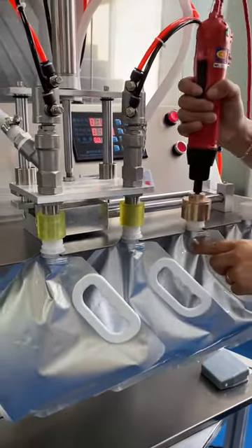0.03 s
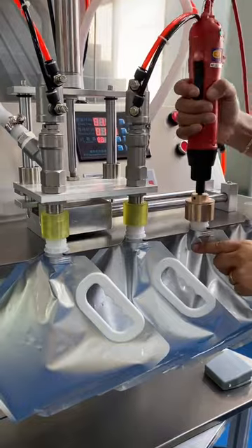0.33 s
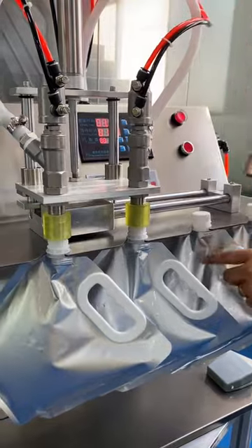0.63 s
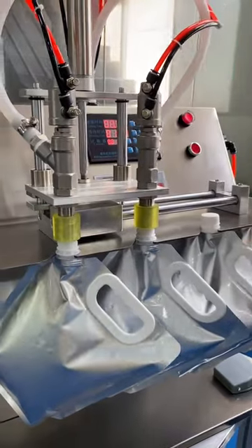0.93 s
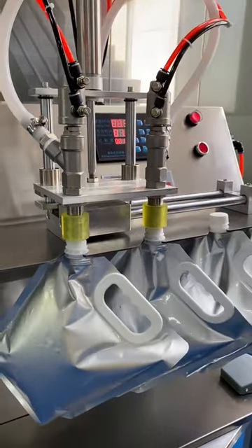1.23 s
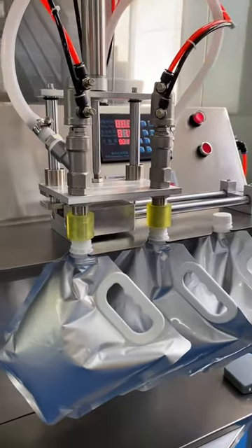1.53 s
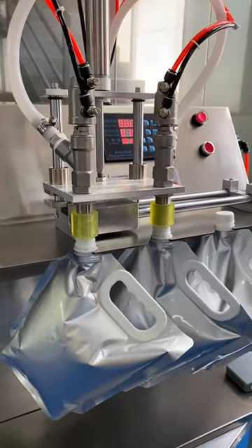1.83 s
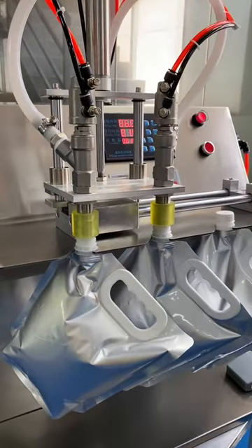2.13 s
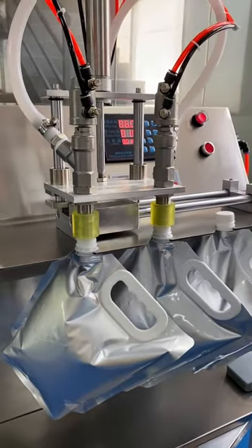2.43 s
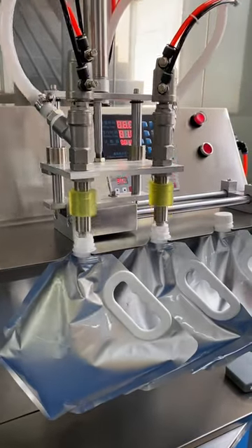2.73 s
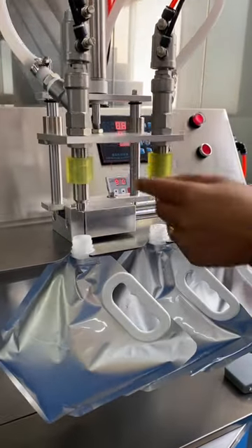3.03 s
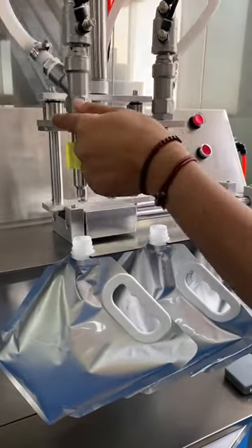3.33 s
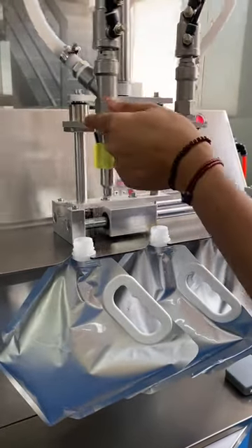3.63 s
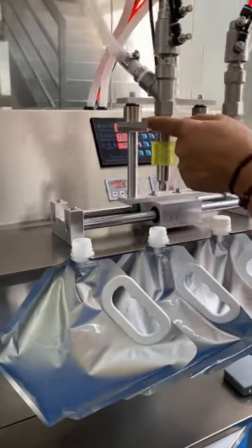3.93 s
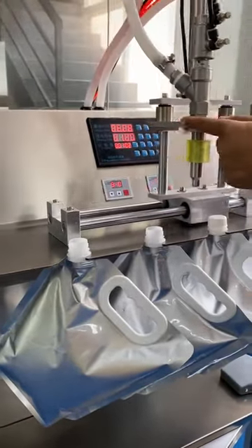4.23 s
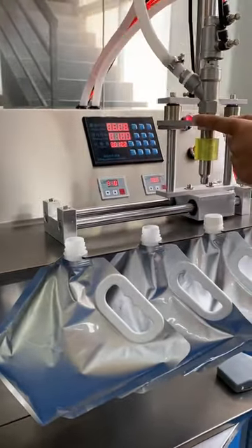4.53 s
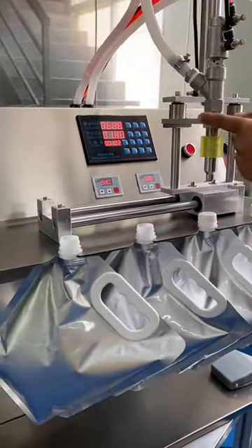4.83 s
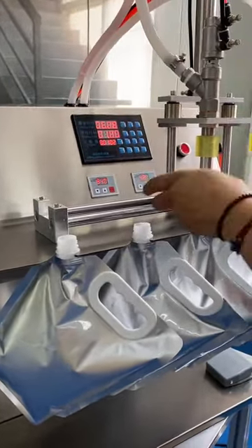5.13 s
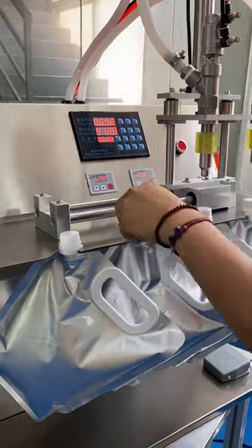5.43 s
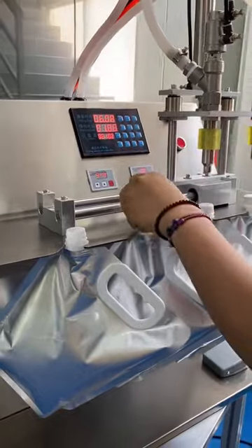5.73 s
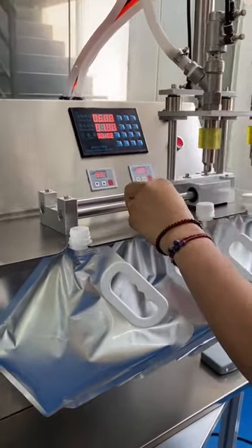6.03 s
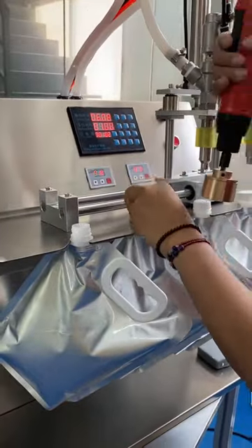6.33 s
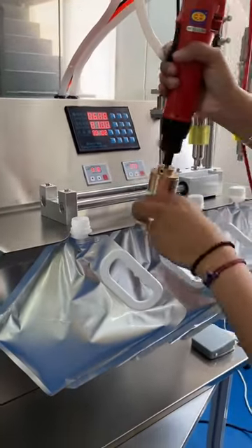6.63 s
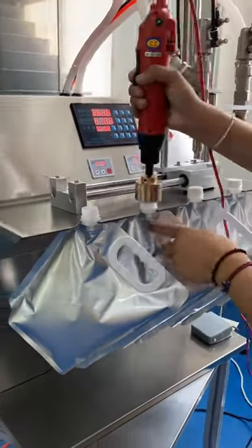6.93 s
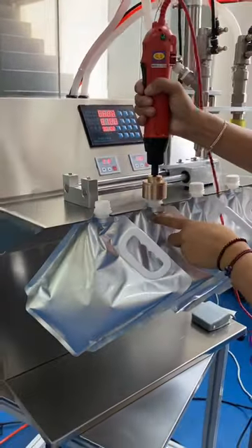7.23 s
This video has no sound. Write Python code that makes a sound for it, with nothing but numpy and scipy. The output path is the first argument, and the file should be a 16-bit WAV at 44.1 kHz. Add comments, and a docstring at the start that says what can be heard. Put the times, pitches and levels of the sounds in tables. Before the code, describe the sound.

An electric capping tool whirrs and rattles, a pump drones and stops, then air puffs, metal knocks and the tool runs again.

```python
"""A pump drones and a hand-held electric capper whirrs, its slip clutch rattling as the cap comes tight.
The microphone is at arm's length from a pneumatic pouch filler in a hard-walled workshop. The valves
shut and the pump coasts to rest; air puffs out, the nozzles lift with a few knocks, and their carriage
rolls along its rails into the end stop. Caps and fittings click, the chuck slides onto another cap and
the capper runs again. Fans and idling motors hum farther off."""
import sys
import numpy as np
from scipy import signal
from scipy.fft import rfft, irfft
from scipy.io import wavfile

SR = 44100
rng = np.random.default_rng(int(sys.argv[2]) if len(sys.argv) > 2 else 0)


def unload_audio(sound):
    """Save the sound as a 16-bit wav file, at the path given as the first command line argument."""
    columns = np.transpose(np.atleast_2d(sound))
    # keep every value between -1 and 1, then stretch to whole-number steps
    steps = np.round(np.clip(columns, -1, 1) * 32767)
    wavfile.write(sys.argv[1], SR, steps.astype(np.int16))


N = 329868
T = np.arange(N) / SR

# The caps. Each row: trigger pulled, cap tight and trigger released in seconds, motor and clutch in dB.
CAP_RUNS = [(-.05, 0.1541, .332, -36, -16.5), (7.047, 7.241, 7.398, -37.5, -18)]
# Tone of the capper's body. Each row: frequency in Hz, level in dB.
CAPPER_SPECTRUM = [(200, -42), (330, 4), (750, 7), (1800, 10.5), (2700, 5.5), (3600, 9), (4300, 1.5),
                   (6000, -0.5), (9300, 0), (12000, -1), (14000, -33)]
# Boom of the heavy table. Each row: frequency in Hz, level in dB.
TABLE_SPECTRUM = [(45, -23.5), (68, 4), (97, 0), (130, -3.5), (190, -7), (400, -21), (900, -62)]
# The carriage hits the end stop and bounces. Each row: start in seconds, level in dB, cutoff in Hz.
STOP_HITS = [(4.7875, -15.5, 12800), (4.7925, -19.5, 2700), (4.809, -13.5, 1070)]
SPIN_UP_S, COAST_S = 0.0065, 0.088  # the capper's motor: time to start, time to rest after release


def undb(db):
    """Decibels to gain."""
    return 10 ** (np.asarray(db) / 20)


def unit(x):
    """Scale to rms 1."""
    return x / np.sqrt(np.mean(x ** 2))


def walk(rate):
    """Random drift with a spread near 1 and `rate` turning points a second."""
    knots = rng.standard_normal(4096)
    return 1.2 * np.interp(T * rate, np.arange(len(knots)), knots)


def colour(x, points):
    """Causal filter with the (Hz, dB) outline; white noise keeps its power."""
    size = 4096
    hz, db = np.transpose(points)
    log_hz = np.log(np.fft.rfftfreq(size, 1 / SR) + 1)
    gain = unit(undb(np.interp(log_hz, np.log(hz), db)))
    cepstrum = irfft(np.log(gain))
    cepstrum[1:size // 2] *= 2  # fold to minimum phase
    cepstrum[size // 2 + 1:] = 0
    return signal.fftconvolve(x, irfft(np.exp(rfft(cepstrum))))[:len(x)]


def noise(points):
    """Noise with the (Hz, dB) outline, rms 1."""
    return unit(colour(rng.standard_normal(N), points))


def fade(t60):
    """One second of exponential decay."""
    return np.exp(-np.log(1000) * T[:SR] / t60)


def burst(t60):
    """A dense cluster of modes dying away together."""
    return rng.standard_normal(SR) * fade(t60)


def ring(modes):
    """Struck modes (Hz, dB, t60) dying away, one second."""
    return sum(undb(db) * rng.choice([-1, 1]) * np.sin(2 * np.pi * hz * T[:SR]) * fade(t60)
               for hz, db, t60 in modes)


def gate(start, end, attack, t60):
    """Rise from the start, hold until the end, then die away."""
    return np.clip((T - start) / attack, 0, 1) * np.exp(-np.log(1000) * np.maximum(T - end, 0) / t60)


def grains(per_s, spread_db):
    """Tiny random impacts of uneven strength."""
    impacts = (rng.random(N) < per_s / SR) * rng.choice([-1, 1], N)
    return impacts * undb(spread_db * np.clip(rng.standard_normal(N), -2, 2))


def lowpass(x, hz, order=2):
    """Round off the treble."""
    return signal.sosfilt(signal.butter(order, min(hz, SR / 2 - 100), fs=SR, output="sos"), x)


def resonate(x, hz, width_hz):
    """Pass through one resonance, rms 1."""
    return unit(signal.lfilter(*signal.iirpeak(hz, hz / width_hz, SR), x))


def add(out, s, x):
    """Mix a sound in at s seconds."""
    i = int(s * SR)
    out[i:i + len(x)] += x[:N - i]


def pump(shaft_hz=38.24, tone_db=-23.5, churn_db=-32, waver_db=1.46, stop_s=1.605, coast_s=0.15):
    """Shaft harmonics over liquid that surges four times a turn; both die away when the fill ends."""
    # The drone. Each row: multiple of the shaft rate, level in dB.
    harmonics = [(2, -12), (4, 0.5), (6, -5.5), (7, 1.5), (8, -1.5), (9, 3), (10, 2.5), (11, -1.5),
                 (12, -14), (13, -7), (14, -9), (16, -8.5), (18, -16), (22, -17), (24, -19.5), (25, -16),
                 (26, -17.5), (27, -17.5), (29, -17.5)]
    # Liquid churning in pump and hoses. Each row: frequency in Hz, level in dB.
    churn_spectrum = [(30, -13), (70, -18), (180, -2.5), (330, 0.5), (550, -4), (800, -6.5), (1200, -11),
                      (2000, -12.5), (2600, -19), (5500, -24.5), (10500, -29.5), (14000, -38.5)]
    angle = 2 * np.pi * shaft_hz * T + 0.019 * walk(12.6)
    beat_db = np.interp(T, [0, 1], [-2, 4.5])  # the four-a-turn beat swells as the pouches fill
    smear = np.interp(T, [0.88, 2.04], [0.6, 1])  # back pressure smears the strokes into a hum
    tone = np.zeros(N)
    for k, db in harmonics:
        # as the beat grows the middle harmonics give way and the upper ones harden
        follow = 1 if k == 4 else -0.71 if 8 <= k <= 10 else 0.64 if k > 11 else 0
        gain = undb(db + waver_db * walk(2.53) + beat_db * follow)
        lag = smear * np.angle(np.exp(1j * np.pi * (k - 9) ** 2 / 5)) + 0.15 * rng.standard_normal()
        tone += gain * np.sin(k * (angle + np.pi / 2) - lag)
    spatter = rng.standard_normal(N) * undb(2 * walk(250))
    churn = unit(colour(spatter, churn_spectrum)) * (1 + 0.12 * np.sin(4 * angle))
    running = np.exp(-np.maximum(T - stop_s, 0) / coast_s)
    return running * (undb(tone_db) * unit(tone) + undb(churn_db) * churn)


def shop(floor_db=-43):
    """Fans and idling motors, far from the microphone."""
    # Motor hum. Each row: frequency in Hz, level in dB.
    hum_tones = [(64.6, -50), (388, -50.5), (786, -63)]
    # Room tone. Each row: frequency in Hz, level in dB.
    floor_spectrum = [(25, -24.5), (54, -5), (76, -33), (95, -2), (290, -4), (392, -8), (649, -16),
                      (802, -15.5), (1260, -24), (2500, -31), (5540, -39.5), (11500, -40.5), (14000, -58)]
    hum = sum(undb(db + 2 * walk(2.8)) * np.sqrt(2) * np.sin(2 * np.pi * hz * T + 0.28 * walk(10))
              for hz, db in hum_tones)
    return hum + undb(floor_db + 0.7 * walk(8.6)) * noise(floor_spectrum)


def capper(strain_db=5, free_db=-10, loaded_db=-6, braking_db=1, shake_db=-7):
    """Brushes hiss in the motor; the gears growl once the cap loads them and again as the motor brakes."""
    brushes = noise(CAPPER_SPECTRUM) * undb(2 * walk(300))
    gears = resonate(lowpass(rng.standard_normal(N), 650), hz=315, width_hz=55)
    shake = undb(shake_db) * noise(TABLE_SPECTRUM)  # the pressed cap shakes the table
    out = np.zeros(N)
    for pulled, tight, released, db, _ in CAP_RUNS:
        slowed, stopped = released + COAST_S / 2, released + COAST_S
        load = np.clip((T - tight) / SPIN_UP_S, 0, 1)
        running = gate(pulled, slowed, SPIN_UP_S, t60=0.4) * undb(strain_db * load)
        braking = undb(braking_db) * gate(slowed, stopped, COAST_S / 2, t60=0.27)
        growl = running * undb(free_db + (loaded_db - free_db) * load) + braking
        out += undb(db) * (running * (brushes + shake) + growl * gears)
    return out


def clutch(slip_hz=75.56, blow_t60=0.014, ease_db_per_s=10, jitter_s=0.0003, lead_s=0.0045):
    """On a tight cap the dogs ride up, snap into the next notch and ping; below half speed they hold."""
    # Crack of a blow. Each row: frequency in Hz, level in dB.
    crack_spectrum = [(200, -13), (330, 1.5), (800, -2), (1500, -12.5), (2800, -7), (4300, 0.5),
                      (5400, 5.5), (6600, -7.5), (9000, -1), (11500, -2), (14000, -25)]
    # Ring of the dogs, the grip and the chuck. Each row: frequency in Hz, level in dB, t60 in seconds.
    dog_modes = [(5175, -3.5, 0.01), (5350, -4.5, 0.013), (6040, -3, 0.0073), (8960, -2, 0.015)]
    grip_modes = [(300, -15, 0.083), (574, -14.5, 0.045)]
    chuck_modes = [(4210, -1.6, 0.012)]
    cracks, pings = np.zeros(N), np.zeros(N)
    housing = burst(blow_t60) + undb(-21) * burst(t60=0.098)
    grip = ring(grip_modes)
    for _, tight, released, _, db in CAP_RUNS:
        t = np.arange(tight, released + COAST_S / 2, 1 / SR)
        notches = np.cumsum(slip_hz * np.interp(t, [released, released + COAST_S], [1, 0])) / SR
        blow_times = np.interp(np.arange(int(notches[-1]) + 1), notches, t)
        for k, at in enumerate(blow_times):
            size = undb(db - ease_db_per_s * (at - tight) + rng.standard_normal())
            seated = min((at - tight) / (released - tight), 1)  # the chuck joins in as it seats
            add(pings, at, size * grip)
            at += jitter_s * rng.standard_normal()
            add(cracks, at, size * (0.75 * housing + 0.77 * burst(blow_t60)))
            add(pings, at, size * (undb(-2) * ring(dog_modes) + seated ** 2 * ring(chuck_modes)))
            if k:  # the small tick of riding up
                add(cracks, at - lead_s, size * undb(-10) * burst(t60=0.017))
    return colour(cracks, crack_spectrum) + pings


def clicks(hollow_db=-4, hollow_t60=0.0067):
    """Plastic, foil and metal tick as they are handled, each with a brief hollow ring."""
    # Caps, pouches and fittings. Each row: start in seconds, level in dB, pitch in Hz, t60 in seconds.
    ticks = [(0.7752, -17.5, 1900, 0.0078), (0.777, -26, 7000, 0.014), (2.038, -36, 1240, 0.18),
             (5.684, -38.5, 1850, 0.17), (5.7, -36.5, 2520, 0.032), (6.292, -43, 2100, 0.092),
             (6.312, -35.5, 1640, 0.066), (6.873, -34, 2060, 0.21), (6.928, -31, 3860, 0.034),
             (6.9453, -29, 1190, 0.057), (7.003, -22, 1310, 0.017), (7.034, -29, 8300, 0.016),
             (7.0465, -27.5, 2200, 0.015), (7.048, -28.5, 420, 0.075)]
    out = np.zeros(N)
    for s, db, hz, t60 in ticks:
        spectrum = [(hz / 8, -14), (hz / 2, -1), (hz, 0), (hz * 2, -7), (hz * 5, -22), (hz * 20, -50)]
        tick = colour(burst(t60), spectrum)
        add(out, s, undb(db) * (tick + ring([(hz, hollow_db, hollow_t60)])))
    return out


def air(bleed_db=-48.5, leak_db=-58, leak_from_s=5.97, leak_rise_s=0.32):
    """Cylinders puff out, air bleeds through a throttle as the nozzles rise, and a thin leak fades in."""
    # Cylinder exhausts. Each row: start in seconds, time open in seconds, level in dB.
    exhausts = [(1.597, 0.053, -30.5), (2.426, 0.037, -32)]
    # Hiss of the exhaust, the throttle and the leak. Each row: frequency in Hz, level in dB.
    exhaust_spectrum = [(300, -15), (900, -13), (2500, 2.5), (3800, -7.5), (5300, -2.5), (8000, -9),
                        (11000, -2), (14000, -14)]
    throttle_spectrum = [(900, 5), (1300, -3.5), (2400, -1), (3400, -8), (4500, -3), (5200, 1.5),
                         (6200, -5.5), (8500, -15), (11500, -10), (14000, -29)]
    leak_spectrum = [(2000, -10), (5000, -7), (8000, -11), (11000, -5), (14000, -22)]
    valves = sum(undb(db) * gate(s, s + length, attack=0.019, t60=0.23) for s, length, db in exhausts)
    puffs = valves * noise(exhaust_spectrum) * undb(walk(120))
    bleed = undb(bleed_db) * gate(2.45, 3.262, attack=0.049, t60=0.079) * noise(throttle_spectrum)
    leak = undb(leak_db) * np.clip((T - leak_from_s) / leak_rise_s, 0, 1) * noise(leak_spectrum)
    return puffs + bleed + leak


def knocks(rebound_s=0.038, thump_lag_s=0.01718, rock_db=-5):
    """Valves and cylinders hit their stops: panels crack, metal rings, the table thumps late and rocks."""
    # Each row: start in seconds, level in dB, cutoff in Hz, then cabinet, table and ring shares in dB.
    blows = [(1.607, -19, 920, -2.5, -2, 2), (1.642, -22.5, 2200, 1, -17, 2),
             (1.6544, -15.5, 3860, -2.5, -18, -9.5), (2.4379, -27, 5630, -6.5, -2, 4.5),
             (2.4438, -24.5, 930, 1, -2, 5), (2.485, -33.5, 610, 1.5, -5, 6), (3.005, -34, 895, 5, -7, 6),
             (3.1987, -15.5, 1135, -5, -5, -9), (3.2515, -25, 1090, -12, -2, -7)]
    # Panels, hollow cabinet under the table top, and plates. Each row: frequency in Hz, level in dB.
    panel_spectrum = [(100, -43.5), (230, 1.5), (330, 3), (600, -10), (1000, -4.5), (1800, -2.5),
                      (2400, -8), (3300, -5), (4800, -5.5), (6300, -21), (14000, -56)]
    cabinet_spectrum = [(180, -34.5), (310, 17), (420, 10), (560, 0), (700, 3.5), (1050, -1), (1500, -32),
                        (4000, -19)]
    plate_spectrum = [(200, -43), (330, 10), (650, 1), (1100, 6), (1500, -14), (2000, 7), (2620, 1),
                      (3400, 4), (6300, -1), (14000, -24)]
    # Ring of the steel frame and the table. Each row: frequency in Hz, level in dB, t60 in seconds.
    frame_modes = [(309.4, 16.5, 0.26), (340, 9.5, 0.24), (457, 7, 0.25), (677, 9.5, 0.43),
                   (1900, 5.5, 0.37), (3060, 4, 0.33)]
    table_modes = [(65.6, -4, .9), (95, -3.5, 0.26)]
    out, thumps = np.zeros(N), np.zeros(N)
    for s, db, cutoff_hz, cabinet_db, thump_db, ring_db in blows:
        ringing = undb(-21) * ring(frame_modes) + undb(-19) * colour(burst(t60=0.95), plate_spectrum)
        metal = undb(ring_db) * ringing + undb(-10) * burst(t60=0.042)
        blow, rebound = (colour(burst(t60=0.046), panel_spectrum)
                         + undb(cabinet_db) * colour(burst(t60=0.13), cabinet_spectrum)
                         for _ in range(2))
        snap = undb(19) * colour(signal.unit_impulse(SR), panel_spectrum)  # first contact
        add(out, s + thump_lag_s, undb(db + thump_db) * ring(table_modes))
        # a cushioned stop is duller
        add(out, s, undb(db) * lowpass(snap + blow + metal, cutoff_hz, order=8))
        add(out, s + rebound_s, undb(db - 10) * lowpass(rebound, hz=800))
        for k in range(4):
            rock = undb(db + thump_db + k * rock_db) * burst(t60=0.22)
            add(thumps, s + thump_lag_s + k * rebound_s, rock)
    return out + colour(thumps, TABLE_SPECTRUM)


def squeal(shove_phase, per_s=260, mean_s=0.11, glide_per_s=0.45, rough_hz=90):
    """Bearings squeal in short rough tones that tend to rise as the carriage speeds up, then to sink."""
    # Range of the squeals. Each row: frequency in Hz, level in dB.
    spectrum = [(600, 4), (800, 5.5), (1250, 2.5), (1550, -4), (2300, -4.5), (3600, -3), (4900, -8),
                (6300, -12)]
    out = np.zeros(N)
    for when, pitch, length, bend in rng.random((int(per_s * T[-1]), 4)):
        s = when * T[-1]
        t = T[:int(mean_s * (0.5 + length) * SR)]
        glide = glide_per_s * (np.cos(shove_phase[int(s * SR)]) + 2 * bend - 1)
        hz = np.interp(pitch, [0, 1], [spectrum[0][0], spectrum[-1][0]]) * np.exp(glide * t)
        contact = np.interp(t * rough_hz, np.arange(20), 0.5 + rng.standard_normal(20))
        add(out, s, np.hanning(len(t)) * contact * np.sin(2 * np.pi * np.cumsum(hz) / SR))
    return unit(colour(out, spectrum))


def carriage(start_s=3.483, shove_s=0.81, shove_db=-38, creep_db=-52):
    """Shoved once, the carriage squeals, then creeps to the stop; its balls grind and the rails sing."""
    # Scrape of the rails. Each row: frequency in Hz, level in dB.
    rail_spectrum = [(250, -3.5), (500, 9), (680, 10.5), (790, 7.5), (950, -1), (1250, 6), (1550, -10),
                     (2300, -0.5), (3300, -9), (5000, -6), (6500, -15), (11000, -14), (14000, -23)]
    shove_phase = np.pi * np.clip((T - start_s) / shove_s, 0, 1)
    shove = undb(shove_db) * np.sin(shove_phase)
    creep = undb(creep_db) * ((T > start_s + shove_s / 2) & (T < STOP_HITS[0][0]))
    grit = grains(per_s=750, spread_db=4)
    scrape = undb(-4) * unit(colour(grit, rail_spectrum))
    sing = undb(-8) * resonate(grit, hz=787, width_hz=14)
    return np.maximum(shove, creep) * (scrape + sing) + shove * undb(-3) * squeal(shove_phase)


def end_stop(rails_db=-36.5, clatter_db=-32.5):
    """The carriage cracks against the stop block; the rails ring on and loose fittings clatter to rest."""
    # The crack and the loose fittings. Each row: frequency in Hz, level in dB.
    crack_spectrum = [(170, -44), (360, -6), (900, -0.5), (1400, -6), (2000, -2), (2600, -4.5), (3600, -11),
                      (4800, -6.5), (6200, -20.5), (11000, -23.5), (14000, -20)]
    fitting_spectrum = [(250, -13), (500, 10), (800, -2), (1300, 7.5), (1480, -9), (1750, -2), (2600, 4.5),
                        (2950, -25), (4800, -9.5), (6300, -25), (14000, -38)]
    # Damped stop block and guide rails. Each row: frequency in Hz, level in dB, t60 in seconds.
    block_modes = [(296, -2.5, 0.13), (398, -2, 0.08), (522, -1.5, 0.043), (762, -12, 0.062),
                   (895, -4, 0.048), (1850, -12, 0.063)]
    rail_modes = [(119, 0.5, 0.82), (337, 8.5, 0.66), (438, 2, 0.7), (570, 0, 0.51), (795, 1.5, 0.93),
                  (1000, -14, 0.4), (1300, -15, 0.82), (1660, 0, 0.43), (2240, -13, 1), (2480, -18, 0.37),
                  (2640, -4.5, 0.95)]
    out = np.zeros(N)
    for s, db, cutoff_hz in STOP_HITS:
        crack = colour(burst(t60=0.063), crack_spectrum)
        add(out, s, undb(db) * lowpass(crack, cutoff_hz, order=8))
    hit_s, hit_db, _ = STOP_HITS[0]
    add(out, hit_s, undb(hit_db + 1) * ring(block_modes) + undb(rails_db) * ring(rail_modes))
    clatter = unit(grains(per_s=260, spread_db=3)) * gate(hit_s, hit_s, attack=0.013, t60=1.0)
    return out + undb(clatter_db) * colour(clatter, fitting_spectrum)


def chuck(start_s=6.88, slide_s=0.046, scrape_db=-44, bump_db=-41, bump_hz=115, t60=0.25):
    """The chuck scrapes over the cap's ribs, then bumps the pouch on the table until the motor starts."""
    landed, motor_on = start_s + slide_s, CAP_RUNS[-1][0]
    scrape = gate(start_s, landed, slide_s, t60) * noise(CAPPER_SPECTRUM) * undb(4 * walk(150))
    thud = [(bump_hz / 8, -14), (bump_hz / 2, -1), (bump_hz, 0), (bump_hz * 5, -22), (bump_hz * 20, -50)]
    bump = gate(landed, motor_on, SPIN_UP_S, t60) * noise(thud)
    return undb(scrape_db) * scrape + undb(bump_db) * bump


def room(x, wet_db, low_t60=1.0, high_t60=0.36, split_hz=4000, build_s=0.0013):
    """Hard walls return a tail whose treble dies first."""
    wash = rng.standard_normal(SR)
    low = lowpass(wash, split_hz, order=1)
    tail = (low * fade(low_t60) + (wash - low) * fade(high_t60)) * (1 - np.exp(-T[:SR] / build_s))
    return x + undb(wet_db) * signal.fftconvolve(x, tail / np.sqrt(np.sum(tail ** 2)))[:N]


def scene():
    """Filler and hand tool at arm's length, the workshop behind them, in mono."""
    machine = room(knocks(), wet_db=-5.5) + room(end_stop(), wet_db=-7.5)
    machine += room(air(), wet_db=-1) + room(carriage(), wet_db=-5) + pump()
    hands = room(clutch(), wet_db=-9) + room(capper(), wet_db=-8.5)
    hands += room(clicks() + chuck(), wet_db=-6.5)
    return (machine + hands + shop())[None]


def record(dry, ceiling=0.86, notch_hz=(6820, 7850), dip_hz=7230, dip_width_hz=1300, top_hz=13100):
    """The microphone rounds loud peaks, has a deep, soft-shouldered treble notch and cuts off the top."""
    heard = ceiling * np.tanh(dry / ceiling)
    heard = signal.sosfilt(signal.butter(4, notch_hz, "bandstop", fs=SR, output="sos"), heard)
    heard = signal.lfilter(*signal.iirnotch(dip_hz, dip_hz / dip_width_hz, SR), heard)
    return signal.sosfilt(signal.ellip(8, 0.2, 70, top_hz, fs=SR, output="sos"), heard)


dry = scene()
out = record(dry)
unload_audio(out)
```